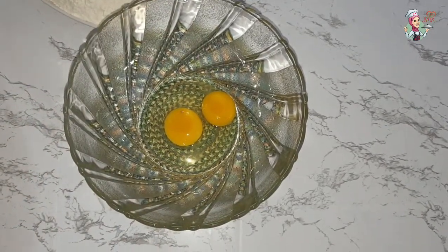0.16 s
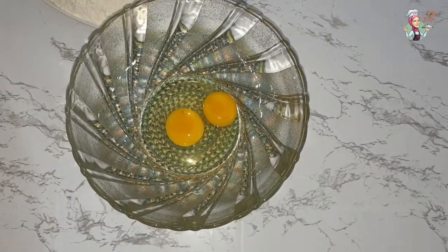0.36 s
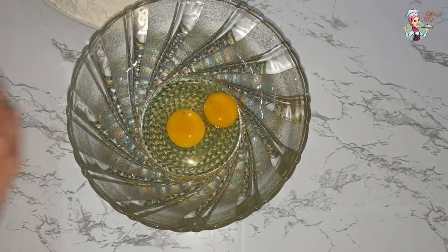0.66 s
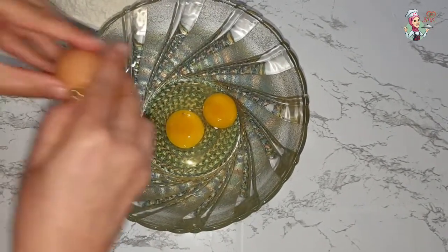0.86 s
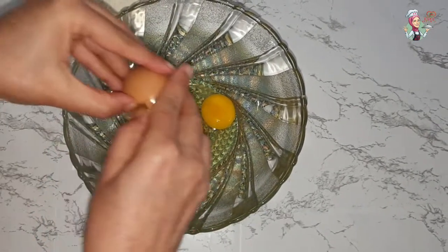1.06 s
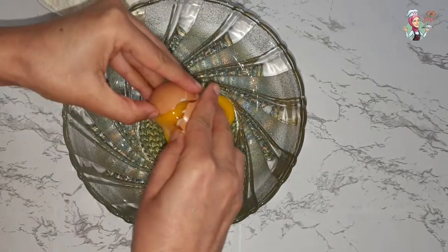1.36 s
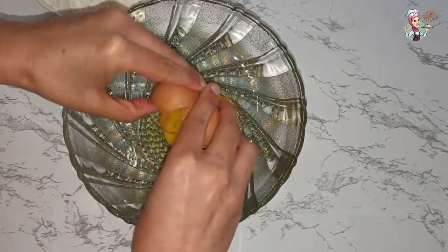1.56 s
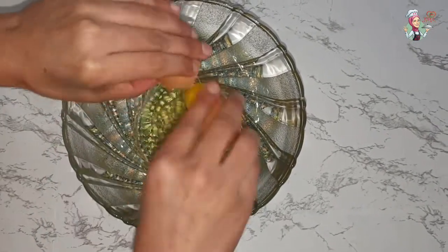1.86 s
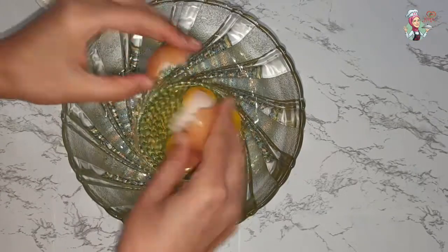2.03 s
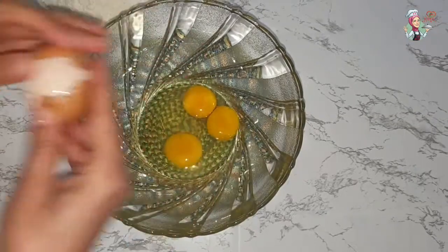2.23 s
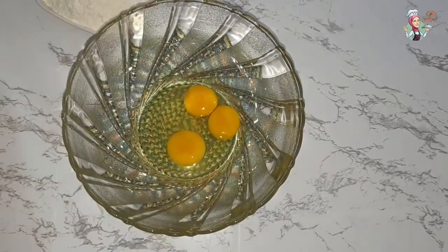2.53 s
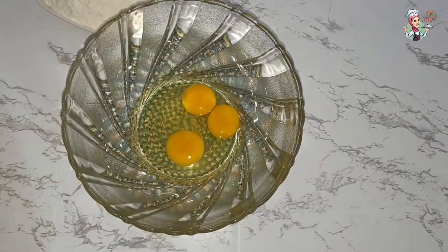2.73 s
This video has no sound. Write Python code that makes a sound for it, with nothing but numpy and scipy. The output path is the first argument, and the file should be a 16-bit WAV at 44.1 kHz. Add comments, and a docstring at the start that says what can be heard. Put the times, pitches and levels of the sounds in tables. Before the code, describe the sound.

Brittle eggshells clatter and land, a short quiet gap follows, fingers rub and crack a full egg sharply, it slides out softly, and the empty halves click together and drop; close stereo microphone, short room reflections, faint low hum.

```python
"""Eggshell snaps, crackles and clatters as eggs are opened by hand over a glass bowl in a small, hard kitchen.
Empty shells are tossed aside and clatter; thumbs press into the next egg and the shell breaks apart;
its halves are pushed together and dropped. Each sound is a brittle noise click plus the short ring of a
hollow shell or air pocket. Thuds, pings, wet plops and soft rubbing join in, over room air and a faint hum."""
import sys
import numpy as np
from scipy import signal
from scipy.fft import rfft, irfft, next_fast_len
from scipy.io import wavfile
from scipy.ndimage import uniform_filter1d

SR = 44100
rng = np.random.default_rng(int(sys.argv[2]) if len(sys.argv) > 2 else 0)


def log_audio(samples):
    """Write samples as a 16-bit WAV file to the path given in sys.argv[1]."""
    # one column per channel
    frames = np.atleast_2d(samples).T
    # limit to full scale, then quantise
    limited = np.clip(frames, -1, 1)
    pcm = np.round(limited * 32767).astype(np.int16)
    wavfile.write(sys.argv[1], SR, pcm)


N = 125685  # length [samples]


def amp(db):
    """Decibels to gain."""
    return 10 ** (np.asarray(db) / 20)


def unit(x):
    """Scale each channel to unit energy."""
    return x / np.sqrt(np.sum(x ** 2, axis=-1, keepdims=True))


def fade(t, t60):
    """Exponential decay, 60 dB down after t60."""
    return np.exp(-np.log(1000) * t / t60)


def pan(db):
    """Left and right gains for a level difference; positive leans left."""
    return amp(np.array([[db], [-db]]) / 2)


def along(hz, points):
    """Read (Hz, value) points on a log-frequency axis."""
    f, v = np.array(points, float).T
    return np.interp(np.log(np.maximum(hz, 1)), np.log(f), v)


def colour(x, points, keep_power=True):
    """Causal minimum-phase filter with the given (Hz, dB) shape."""
    n = 2 * next_fast_len(x.shape[-1])
    gain = amp(along(np.fft.rfftfreq(n, 1 / SR), points))
    if keep_power:
        gain = gain / np.sqrt(np.mean(gain ** 2))
    # folding the cepstrum onto positive times makes the filter causal
    cepstrum = irfft(np.log(gain))
    cepstrum[1:n // 2] *= 2
    cepstrum[n // 2 + 1:] = 0
    response = np.exp(rfft(cepstrum))
    return irfft(rfft(x, n) * response)[..., :x.shape[-1]]


def add(out, s, x):
    """Mix x into out from time s."""
    i = int(s * SR)
    out[:, i:i + x.shape[-1]] += x[..., :max(N - i, 0)]


# spectrum of the room air: (frequency [Hz], density [dB per Hz])
AIR_TONE = [(28, -37), (60, -14), (100, -11), (170, -17.5), (240, -25.5), (450, -28.5), (840, -31),
            (1600, -37.5), (2400, -36.5), (8000, -42.5), (15000, -35)]
# swell of the hum around its base level: (time [s], level [dB])
HUM_SWELL = [(0, 9.5), (.12, -2), (.6, -6.5), (.75, -5), (2.08, -4.5), (2.2, 11.5), (2.3, 13), (2.38, 1),
             (2.85, -3)]
AIR_DB, AIR_SIDE_DB = -67, -2  # side is relative to mid
HUM_HZ, HUM_BASE_DB = 61.2, -68


def background():
    """Faint room air is coloured noise; a low sine hum wavers and swells beneath it."""
    t = np.arange(N) / SR
    mid, side, *slow = rng.standard_normal((4, N))
    stereo = mid + amp(AIR_SIDE_DB) * side * np.array([[1], [-1]])
    air = amp(AIR_DB) * colour(stereo, AIR_TONE)
    smooth = uniform_filter1d(uniform_filter1d(np.array(slow), size=4000), size=4000)
    waver, drift = unit(smooth) * np.sqrt(N)
    hum_db = HUM_BASE_DB + np.interp(t, *np.array(HUM_SWELL).T) + 2.5 * waver
    hum = amp(hum_db) * np.sqrt(2) * np.sin(2 * np.pi * HUM_HZ * t + 0.34 * drift)
    return pan(0.84) * (air + hum)


# decay of the kitchen tail: (frequency [Hz], t60 [s])
ROOM_T60 = [(200, 0.5), (600, 0.16), (1500, 0.35), (3000, .27), (6000, 0.28), (15000, 0.38)]
# colour of the kitchen tail: (frequency [Hz], gain [dB])
ROOM_TONE = [(200, -12), (800, -4.5), (1700, -7.5), (3200, -1), (6000, -7), (9000, -10), (15000, -11)]
DIRECT_LEFT_DB, ROOM_LEFT_DB = 1.5, 3
EARLY_DB, EARLY_T60_S = -3, .032
WALL_DB, WALL_S, WALL_T60_S = -11, .0098, .05
TAIL_RISE_S = .0028


def kitchen(x):
    """Direct sound in stereo, scatter from bowl and counter, one wall echo and a short tail."""
    n = SR // 2
    t, hz = np.arange(n) / SR, np.fft.rfftfreq(n, 1 / SR)
    noise, tail = rfft(rng.standard_normal((2, n))), 0
    edges = np.r_[0, np.geomspace(250, SR / 2, 14)]
    for lo, hi in zip(edges, edges[1:]):
        band = irfft(noise * ((hz >= lo) & (hz < hi)), n)
        band = band * fade(t, along((lo + hi) / 2, ROOM_T60)) * (1 - np.exp(-t / TAIL_RISE_S))
        tail = tail + unit(band) * np.sqrt(2 * (hi - lo) / SR)  # energy follows bandwidth
    early = amp(EARLY_DB) * unit(rng.standard_normal((2, n)) * fade(t, EARLY_T60_S))
    wall = amp(WALL_DB) * unit(rng.standard_normal((2, n)) * fade(t, WALL_T60_S))
    echo = np.roll(wall, int(WALL_S * SR), axis=1)
    response = colour(tail, ROOM_TONE, False) + early + echo
    room = signal.fftconvolve(x, response, axes=1)[:, :N]
    return pan(DIRECT_LEFT_DB) * x + pan(ROOM_LEFT_DB) * room


# hands rubbing on the egg: (time [s], length [s], level [dB])
RUBS = [(0.667, 0.18, -61.5), (0.821, 0.26, -60.5), (1.045, 0.22, -60.5)]
# colour of the rubbing: (frequency [Hz], density [dB per Hz])
RUB_TONE = [(60, 5), (170, 0), (330, 4.5), (600, -6), (1200, -13), (3000, -18), (8000, -10), (15000, -14)]


def rubbing():
    """Fingers slide softly over the egg: coloured noise that swells in and fades out."""
    out = np.zeros((2, N))
    for s, length, db in RUBS:
        n = int(length * SR)
        noise = rng.standard_normal((2, n))
        add(out, s, amp(db) * noise * signal.windows.tukey(n, .5))
    return colour(out, RUB_TONE)


# dull thuds as shells land or give way: (time [s], ring level [dB], thump level [dB], thump t60 [s])
THUDS = [(.309, -31, -40, 0.099), (0.357, -37, -21, 0.11), (0.369, -31, -22, .07),
         (1.3096, -60, -33, 0.028)]
# modes of the work surface: (frequency [Hz], level [dB])
SURFACE_MODES = [(205, -11.5), (335, -3), (463, 0), (635, -1.5), (754, -7), (901, 0.5), (1061, -5),
                 (1275, -1), (1351, -3.5), (1422, -2), (1632, -2.5), (1684, -3.5)]
SURFACE_T60_S = 0.19
# colour of the thump: (frequency [Hz], density [dB per Hz])
THUD_TONE = [(60, -34.5), (130, -26), (200, -3), (300, -2.5), (500, -6.5), (900, 0.5), (1400, 0),
             (3000, -20.5), (15000, -47.5)]


def thuds():
    """Heavier blows give a dull noise thump, and the modes of the work surface ring on."""
    t = np.arange(SR // 2) / SR
    rings, thumps = np.zeros((2, N)), np.zeros((2, N))
    for s, ring_db, thump_db, t60 in THUDS:
        surface = 0
        for hz, mode_db in SURFACE_MODES:
            cycles = hz * t + rng.random() + rng.random((2, 1)) / 2
            surface = surface + amp(mode_db) * np.sin(2 * np.pi * cycles)
        rise = 1 - np.exp(-10 * t / t60)
        add(rings, s, amp(ring_db) * surface * fade(t, SURFACE_T60_S) * rise)
        add(thumps, s, amp(thump_db) * rng.standard_normal(len(t)) * fade(t, t60) * rise)
    return pan(ROOM_LEFT_DB) * rings + kitchen(colour(thumps, THUD_TONE))


CLICK_SIZE = 2048  # samples
HIT_SIZE = np.sqrt(.002 * SR)  # hit levels are rms over 2 ms
HOLLOW_RISE_S = .0003


def ring(hz, db, modes, t60, detune):
    """A short stereo ring, a quarter cycle apart left to right; each mode is detuned a little per hit."""
    t = np.arange(CLICK_SIZE) / SR
    phase = np.array([[0], [rng.choice([-1, 1]) * np.pi / 2]])
    tones = 0
    for ratio, mode_db in modes:
        mode_hz = ratio * hz * np.exp(detune * rng.standard_normal())
        tones = tones + amp(mode_db) * np.sin(2 * np.pi * (mode_hz * t + rng.random()) + phase)
    rise = 1 - np.exp(-t / HOLLOW_RISE_S)
    return HIT_SIZE * amp(db) * unit(tones * fade(t, t60) * rise)


def single_rings(rows, t60):
    """One quickly damped resonance for each event."""
    out = np.zeros((2, N))
    for s, hz, db in rows:
        add(out, s, ring(hz, db, [(1, 0)], t60, 0))
    return out


# soft wet plops as the egg slides out: (time [s], pitch [Hz], level [dB])
PLOPS = [(1.639, 720, -58.5), (1.7165, 684, -58), (1.8235, 725, -55.5), (1.9165, 2045, -41.5),
         (1.96, 2190, -51)]


def plops():
    """The egg slides out with soft wet plops, each a single damped tone."""
    return single_rings(PLOPS, t60=.018)


# the shell wall pings on sharp cracks: (time [s], pitch [Hz], level [dB])
PINGS = [(.2026, 2600, -27), (.553, 2560, -39), (1.5243, 6570, -24.5), (1.8235, 6430, -38),
         (2.162, 8080, -21), (2.2615, 5340, -26.5), (2.5043, 6000, -30), (2.5515, 4220, -30),
         (2.5615, 6000, -31)]


def pings():
    """The shell wall rings at one pitch and dies almost at once."""
    return single_rings(PINGS, t60=.007)


# modes of a hollow shell: (multiple of its main pitch, level [dB])
HOLLOW_MODES = [(1, 17), (.88, -5.5), (1.15, -1.5), (1.6, -5)]
CLICK_T60_S, HOLLOW_T60_S, HOLLOW_DETUNE = .009, .018, .025
RIGHT_LAG_S = .0004


def shell(rows, tone, modes=HOLLOW_MODES, t60=HOLLOW_T60_S, detune=HOLLOW_DETUNE):
    """Each fracture or contact is a brittle burst, and the hollow of the shell rings briefly."""
    t = np.arange(CLICK_SIZE) / SR
    clicks, hollows = np.zeros((2, N)), np.zeros((2, N))
    for s, click_db, hz, hollow_db in rows:
        spectrum = rfft(rng.standard_normal((2, CLICK_SIZE)) * fade(t, CLICK_T60_S))
        evened = spectrum / np.sqrt(abs(spectrum))  # halves the peaks and dips in dB
        burst = irfft(evened) * fade(t, 10 * CLICK_T60_S)
        add(clicks, s, HIT_SIZE * amp(click_db) * unit(burst))
        add(hollows, s, ring(hz, hollow_db, modes, t60, detune))
    clicks[1] = np.roll(clicks[1], int(RIGHT_LAG_S * SR))
    return colour(clicks, tone) + hollows


GRAIN_SCATTER_DB, GRAIN_DETUNE = 4, .15


def fractures(runs, count=26):
    """Shell gives way in quick runs of tiny fractures of uneven size."""
    grains = []
    for s, length, db, hz, hollow_db in runs:
        times = s + length * (np.arange(count) + rng.random(count)) / count
        sizes = unit(amp(GRAIN_SCATTER_DB * rng.standard_normal(count)))
        # the run's energy is its level held for its length, shared among 2 ms hits
        share = 20 * np.log10(sizes * np.sqrt(length / .002))
        pitches = hz * np.exp(GRAIN_DETUNE * rng.standard_normal(count))
        grains += zip(times, db + share, pitches, hollow_db + share)
    return grains


# empty shells landing: (time [s], click level [dB], hollow pitch [Hz], hollow level [dB])
LANDINGS = [(.1828, -48.5, 1850, -46.5), (.2026, -23.5, 1815, -14), (.2105, -34, 1830, -18),
            (.245, -29, 2040, -33), (.267, -37, 1710, -52.5), (.288, -31.5, 2430, -28.5),
            (.3075, -19, 1325, -15), (.3145, -30.5, 1610, -22), (.322, -23.5, 1240, -23),
            (.3285, -15.5, 1720, -11.5), (.354, -22.5, 2000, -30), (.360, -16, 1450, -20.5),
            (.3655, -24.5, 1680, -18.5), (.3705, -19.5, 1200, -26), (.3765, -20, 1440, -21),
            (.484, -38.5, 2060, -54.5), (.553, -43.5, 2445, -39), (.5545, -54.5, 1453, -45),
            (.566, -50, 2014, -44)]
# colour of their clicks: (frequency [Hz], density [dB per Hz])
LANDING_TONE = [(60, -36), (200, -25), (400, -11), (850, 5.5), (1300, 2.5), (2400, 5.5), (3500, -2),
                (5000, -1.5), (8000, -4), (11000, -9), (15000, -13.5)]


def landings():
    """Tossed empty shells clatter down, each contact a click and a hollow ring."""
    return shell(LANDINGS, LANDING_TONE)


# empty halves knocking together: (time [s], click level [dB], hollow pitch [Hz], hollow level [dB])
KNOCKS = [(2.162, -19, 2057, -26), (2.170, -34, 1910, -36), (2.1895, -39, 2070, -43),
          (2.202, -27.5, 1860, -25), (2.218, -40, 1780, -26.5), (2.2275, -26.5, 1900, -22),
          (2.243, -20, 2030, -34), (2.253, -25, 1870, -32.5), (2.2615, -28.5, 2050, -44),
          (2.4325, -44.5, 1670, -45), (2.5043, -25, 1610, -22), (2.511, -58, 1635, -29.5),
          (2.5155, -27.5, 1570, -22.5), (2.5328, -23, 1656, -25), (2.541, -29, 1532, -28),
          (2.5515, -22, 1680, -26.5), (2.5615, -26.5, 1658, -30.5), (2.569, -40, 1630, -32.5)]
# colour of their clicks: (frequency [Hz], density [dB per Hz])
KNOCK_TONE = [(60, -22.5), (200, -4), (400, -12.5), (800, -1.5), (1300, -12.5), (2200, 9.5), (3200, 1),
              (5000, 4.5), (8000, 4.5), (11000, 8.5), (15000, -2.5)]


def knocks():
    """Empty halves knock together, and their hollows answer the clicks."""
    return shell(KNOCKS, KNOCK_TONE)


# shell being crushed: (time [s], length [s], level [dB], hollow pitch [Hz], hollow level [dB])
CRUNCHES = [(0.189, 0.016, -35.5, 1840, -36.5), (0.212, 0.045, -42, 1960, -37),
            (0.293, 0.025, -42, 1950, -33.5), (0.311, 0.026, -35, 1452, -24),
            (0.346, 0.021, -35, 1480, -25), (0.823, 0.04, -53, 870, -62), (0.859, 0.052, -47.5, 980, -62.5),
            (0.919, 0.048, -58, 1490, -66.5), (2.18, 0.035, -32.5, 2070, -44),
            (2.215, 0.035, -28.5, 1450, -36), (2.258, 0.031, -36, 1890, -43),
            (2.296, 0.037, -46.5, 1820, -49), (2.435, 0.072, -58, 1890, -50),
            (2.529, 0.055, -47.5, 1730, -38)]
# colour of the crushing: (frequency [Hz], density [dB per Hz])
CRUNCH_TONE = [(60, -25), (200, -13), (400, -14.5), (800, 5), (1300, -13.5), (2300, 7.5), (3300, -3),
               (5000, 5.5), (8000, 6), (11000, 5), (15000, -4)]


def crunching():
    """Crushed shell breaks in dense runs of clicks with hollow rings."""
    return shell(fractures(CRUNCHES), CRUNCH_TONE)


# modes of the air pocket under a break in a full egg: (multiple of its main pitch, level [dB])
POCKET_MODES = [(1, 0), (.6, -23.5), (.76, -16), (1.25, 0)]
# colour of the dry cracks: (frequency [Hz], density [dB per Hz])
SNAP_TONE = [(60, -28.5), (200, -29), (420, -18), (700, -17.5), (1150, -34), (1800, -6.5), (2500, -23.5),
             (3500, -10.5), (5000, 1.5), (7000, 6.5), (11000, 8), (15000, 1)]


def full_egg(rows):
    """A full egg cracks drily: its contents damp the small air pocket under the break."""
    return shell(rows, SNAP_TONE, POCKET_MODES, t60=.007, detune=.11)


# crackle along the membrane: (time [s], length [s], level [dB], pocket pitch [Hz], pocket level [dB])
CRACKLES = [(.58, 0.091, -66.5, 2500, -73.5), (1.24, 0.061, -49, 1310, -65.5),
            (1.286, 0.031, -27, 3520, -37.5), (1.37, 0.068, -57, 2490, -58),
            (1.478, 0.042, -45, 3110, -51.5), (1.55, 0.17, -53.5, 2260, -60),
            (1.838, 0.03, -51.5, 3510, -62), (1.892, 0.028, -54, 1930, -62),
            (1.95, 0.077, -65.5, 2010, -70.5), (2.432, 0.073, -46, 4400, -53)]


def crackling():
    """Shell tears along its membrane in a thin crackle of tiny dry fractures."""
    return full_egg(fractures(CRACKLES))


# shell snapping under the fingers: (time [s], click level [dB], pocket pitch [Hz], pocket level [dB])
SNAPS = [(.6895, -55.5, 2590, -67), (.8205, -46.5, 900, -59), (.857, -40.5, 984, -49),
         (.888, -45.5, 1385, -53.5), (.894, -49, 920, -52.5), (.9295, -43.5, 2200, -68),
         (.9435, -38, 2220, -72), (1.0845, -52.5, 2200, -62), (1.1025, -44.5, 595, -53),
         (1.239, -37.5, 2990, -68), (1.2565, -36, 1350, -56), (1.2847, -12.5, 1420, -53.5),
         (1.2965, -15.5, 1360, -39), (1.3082, -19, 2410, -30), (1.3106, -13.5, 4090, -21.5),
         (1.3195, -46, 3000, -54), (1.385, -48, 3470, -43), (1.3975, -30, 2380, -42),
         (1.415, -38, 2500, -42.5), (1.474, -41, 3760, -40.5), (1.487, -39, 3400, -53),
         (1.5035, -44.5, 2700, -49), (1.5215, -41.5, 3420, -31), (1.5243, -17.5, 2460, -59),
         (1.5305, -38, 2440, -36.5), (1.585, -38, 2840, -39.5), (1.594, -60, 3120, -50),
         (1.6115, -38.5, 3150, -54), (1.639, -42.5, 3310, -43), (1.680, -46, 3400, -46),
         (1.7165, -38.5, 3440, -46.5), (1.7815, -51, 3300, -78), (1.8235, -37.5, 3400, -48),
         (1.832, -41, 3630, -54), (1.890, -48.5, 3000, -49), (1.9165, -33.5, 1940, -51),
         (1.937, -39.5, 1950, -59), (2.1026, -40.5, 6080, -61), (2.4192, -30, 4330, -40),
         (2.8285, -55, 6780, -54)]


def snapping():
    """Thumbs press in and the shell snaps, each break a dry click and a damped pocket ring."""
    return full_egg(SNAPS)


def scene():
    """All shell sounds in the kitchen, over its air and hum."""
    hits = landings() + snapping() + knocks()
    runs = crunching() + crackling()
    rings = pings() + plops()
    return kitchen(hits + runs + rings + rubbing()) + thuds() + background()


TOP_HZ = 15600


def record(dry):
    """Clip at full scale, then cut the top with a steep elliptic low-pass."""
    top_cut = signal.ellip(8, .2, 70, TOP_HZ, fs=SR, output="sos")  # ripple .2 dB, stopband -70 dB
    return signal.sosfilt(top_cut, np.clip(dry, -1, 1))


dry = scene()
out = record(dry)
log_audio(out)
```